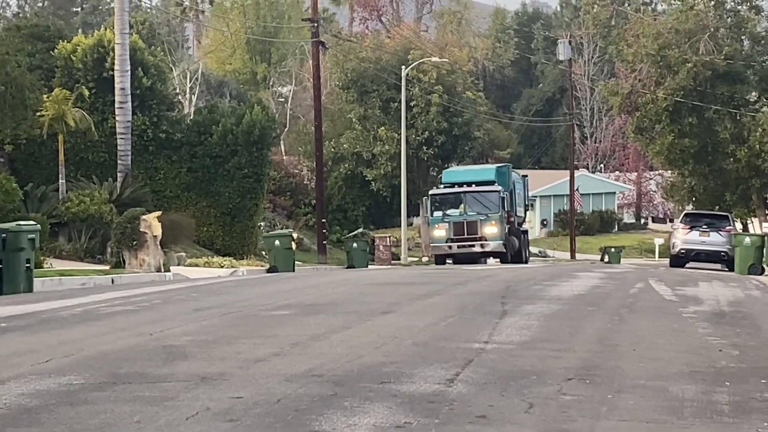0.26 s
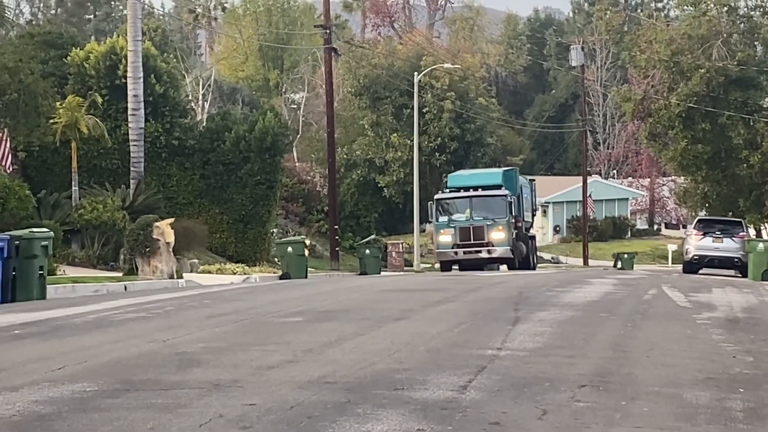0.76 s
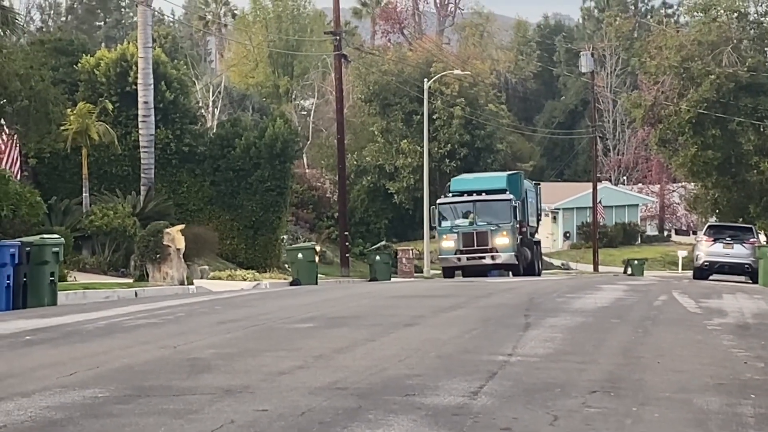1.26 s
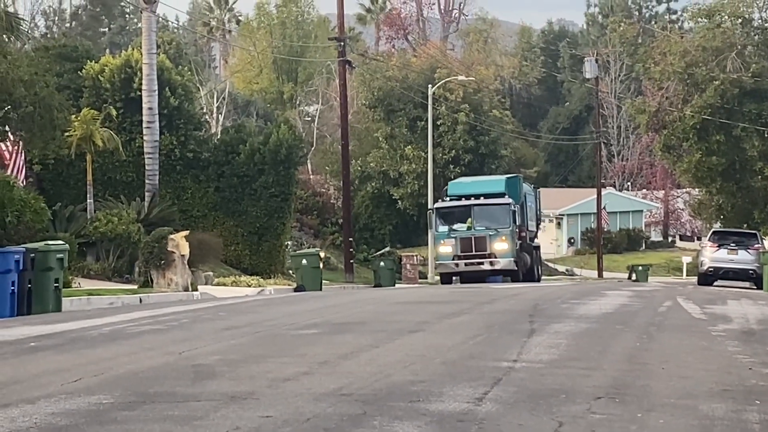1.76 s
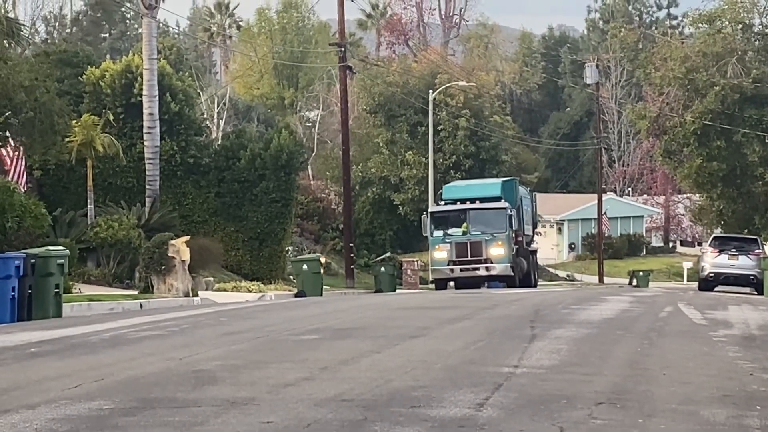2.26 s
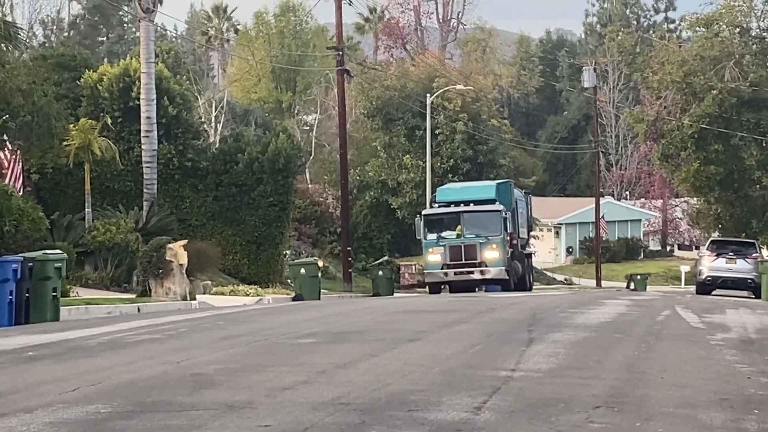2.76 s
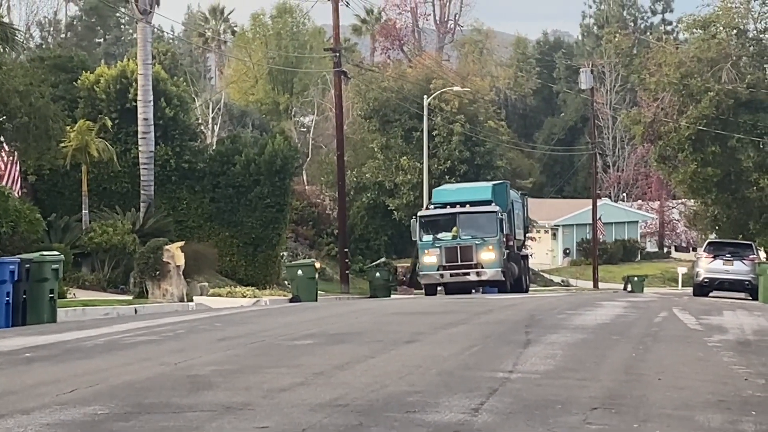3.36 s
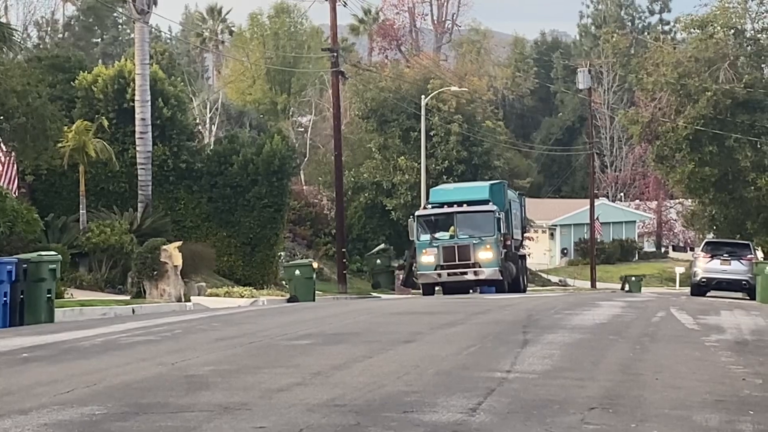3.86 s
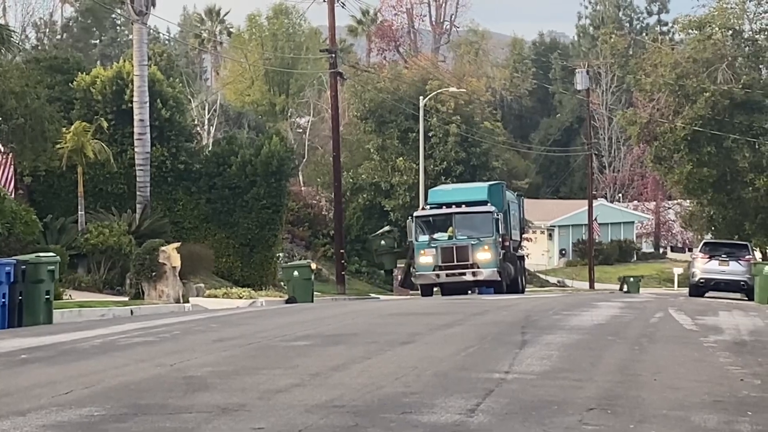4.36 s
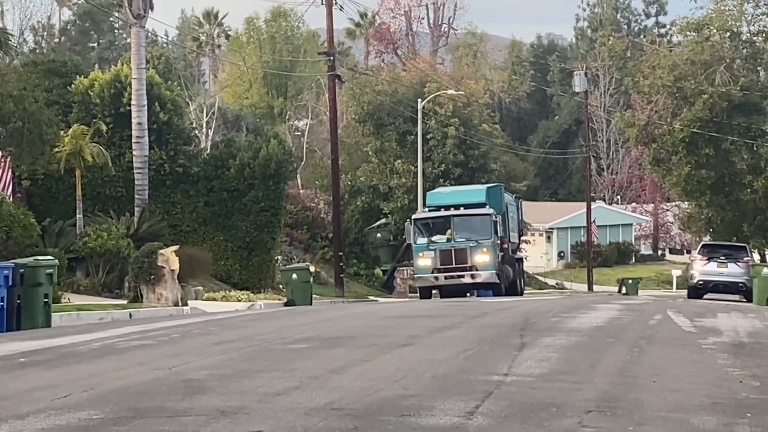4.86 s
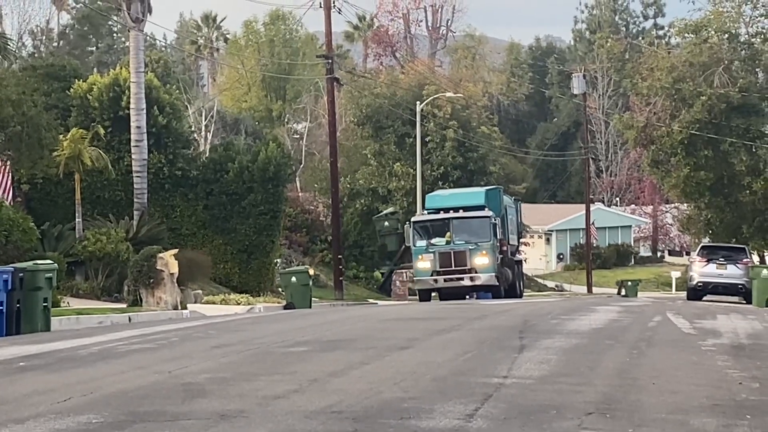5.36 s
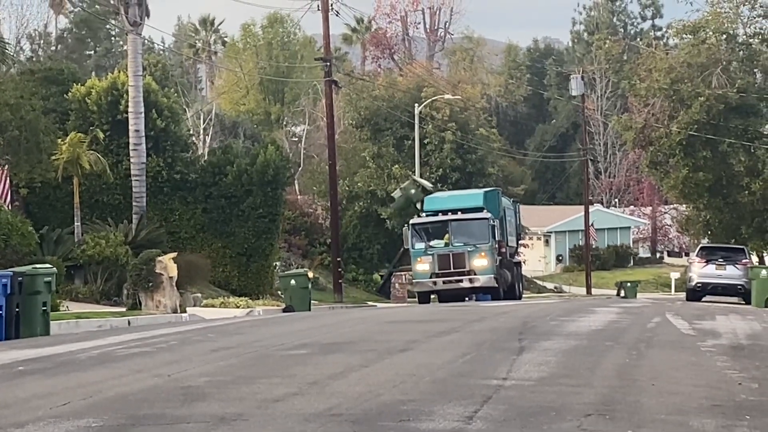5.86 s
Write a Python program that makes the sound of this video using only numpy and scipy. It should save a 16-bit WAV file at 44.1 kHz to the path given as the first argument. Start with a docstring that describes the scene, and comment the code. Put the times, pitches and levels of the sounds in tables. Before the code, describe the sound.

Distant garbage truck engine roars and whines, drops off, hisses and squeals to a stop, revs again, then metal body parts crash.

```python
"""A heavy refuse truck's six-cylinder engine pulls far down a residential street, eases off and pulls again;
its hydraulic pump whines along, a tone and throbbing noise locked to one shaft. A sinking aircraft whine is a
gliding sine, and a thin hiss is filtered noise. The brakes squeal in narrow-band modes and puff noise; then
steel body parts bang and bounce as decaying noise and ringing modes. House fronts scatter the sound to a pair
of microphone ports."""
import sys
import numpy as np
from scipy import signal
from scipy.fft import rfft, irfft, next_fast_len
from scipy.io import wavfile
from scipy.ndimage import uniform_filter1d, map_coordinates

SR = 44100
rng = np.random.default_rng(int(sys.argv[2]) if len(sys.argv) > 2 else 0)


def unload_wav(signal):
    """Save mono or channel-first audio to the path in sys.argv[1] as 16-bit WAV at rate SR, clipped to [-1, 1]."""
    wavfile.write(
        sys.argv[1],
        SR,
        np.round(np.clip(np.atleast_2d(signal).T, -1, 1) * 32767).astype(np.int16),
    )


N = 269451


def amp(db):
    """Level definition: 20 dB is a factor of ten in amplitude."""
    return 10 ** (np.asarray(db) / 20)


def unit(x):
    """Normalization: scale a signal to rms 1."""
    return x / np.sqrt(np.mean(x ** 2) + 1e-20)


def along(points, hz):
    """Logarithmic frequency scale: interpolate (f/Hz, value) points."""
    f, value = np.transpose(points)
    return np.interp(np.log(hz + 1), np.log(f + 1), value)


def curves(rows):
    """Linear interpolation in time: one value per sample for each column after t/s."""
    s, *columns = np.transpose(rows)
    t = np.arange(N) / SR
    return [np.interp(t, s, column) for column in columns]


def wobble(rate):
    """Slow random modulation: a smooth curve through `rate` Gaussian knots a second."""
    knots = rng.standard_normal(int(N * rate / SR) + 4)
    return map_coordinates(knots, [np.arange(N) * rate / SR])


def swell(peak_s, db, rise_s, fall_s):
    """Exponential growth and decay: 20 dB up to the peak, and down from it, in each given time."""
    t = np.arange(N) / SR - peak_s
    return amp(db - 20 * np.maximum(-t / rise_s, t / fall_s))


def filtered(x, response):
    """Linear filtering: multiply the spectrum by a complex response of frequency."""
    m = next_fast_len(N + SR // 2)
    spectrum = rfft(x, m) * response(np.fft.rfftfreq(m, 1 / SR))
    return irfft(spectrum, m)[..., :N]


def noise(spectrum, patchy_db, throb=1, knocks=0):
    """Subtractive synthesis: patchy noise plus knocks, modulated, then coloured and scaled to rms 1."""
    z = signal.stft(rng.standard_normal(N), nperseg=512)[2]
    # smooth over neighbouring bands, then over time
    field = uniform_filter1d(rng.standard_normal(z.shape), 6, 0)
    field = uniform_filter1d(field, 12, 1)
    white = signal.istft(z * amp(patchy_db * unit(field)), nperseg=512)[1][:N]
    source = throb * (unit(white) + knocks)
    return unit(filtered(source, lambda hz: amp(along(spectrum, hz))))


def tone(cycles):
    """Phase-driven oscillator: a sine of rms 1 at a random starting phase."""
    return np.sqrt(2) * np.sin(2 * np.pi * (cycles + rng.random()))


# brief dips of the pump tone: t/s, depth/dB, half width/s
PUMP_DIPS = [(2.55, 15.5, 0.1495), (4.3, 14, 0.063), (4.54, 30, 0.0688), (5.5, 7.5, 0.06894)]


def pump(teeth, pump_db):
    """Tooth-passing tone: each pump tooth gives one cycle, with small level and phase jitter."""
    t = np.arange(N) / SR
    dips_db = sum(db * np.clip(1 - np.abs(t - s) / half, 0, 1) for s, db, half in PUMP_DIPS)
    return amp(pump_db - dips_db + 1.3 * wobble(18)) * tone(teeth + .032 * wobble(28))


# gear whines: multiple of the tooth rate, peak t/s, mean peak level/dB, rise/s per 20 dB, fall/s per 20 dB
WHINES = [(5.06, .3, -51, .8, .8), (4.07, .85, -47, 1.6, 1.2), (6, .85, -51, .7, .7),
          (8.5, .9, -57, .6, .5), (4.07, 3, -52, 1.4, .87), (8.15, 3.1, -60.5, 2.2, .64),
          (4.06, 4.25, -47.5, .5, 1.2), (5.07, 4.45, -48, .8, .9), (8.35, 4.5, -54, .3, .2),
          (2, 4.55, -39, .5, .05), (4.07, 4.72, -45, .4, 1.4), (2, 4.9, -34, .3, .1),
          (2, 5.253, -42, .32, .5)]


def gears(teeth):
    """Gear-mesh tones: fixed ratios to the shaft, each swelling and fading."""
    out = np.zeros(N)
    for ratio, *shape in WHINES:
        level = swell(*shape) * amp(3.2 * wobble(15))
        out += level * tone(ratio * teeth + .09 * wobble(32))
    return out


# engine orders: multiple of the firing rate, mean level/dB re the firing tone
ORDERS_OF_FIRING = [(.5, -35), (1.5, -30), (2, -33), (2.5, -13), (3, -34.5)]


def firing_tones(firings):
    """Engine orders: a firing tone with wavering tones at multiples of its rate."""
    out = tone(firings)
    for order, db in ORDERS_OF_FIRING:
        out += amp(db + 2.8 * wobble(6.9)) * tone(order * firings)
    return out


# spectrum of the pipe's lowest resonances: f/Hz, relative level/dB per Hz
BOOM = [(20, -48), (40, -15.5), (62, -4.5), (85, 2), (100, -1.5), (130, -15), (165, -8), (200, -9),
        (250, -40), (300, -63)]
BOOM_DB, BOOM_GROWS = -38, 0.214  # mean level at full load; dB per dB of load


def boom(load_db):
    """Pipe resonance: low-frequency noise coloured by the exhaust pipe's lowest modes."""
    level_db = BOOM_DB + BOOM_GROWS * load_db + 1.1 * wobble(6)
    return amp(level_db) * noise(BOOM, patchy_db=1.0)


# exhaust roar spectrum: f/Hz, relative level/dB per Hz
ROAR = [(65, -36), (110, -5), (130, -12), (163, -5), (183, -5.5), (232, -5), (360, -4.5), (482, -8.5),
        (601, -5.5), (676, -22), (720, -27), (940, -52), (1580, -120)]


def exhaust_roar(pulse):
    """Amplitude modulation: each firing throbs the exhaust noise."""
    return noise(ROAR, patchy_db=0.8868, throb=1 + 0.763 * pulse)


# block and fan spectrum before the panels: f/Hz, relative level/dB per Hz
RUSH = [(400, -25.5), (680, 1.5), (1000, 0.5), (1400, -1.5), (1850, -7), (2200, -5), (2450, -7.5),
        (2650, -11), (3150, -10.5), (4000, -13), (5000, -17.5), (7000, -27), (9000, -32), (16000, -67)]
# cab and block resonances: f/Hz, width/Hz, lift/dB
PANELS = [(860, 30, 4), (1032, 25, 5), (1255, 25, 3), (1684, 22, 4), (1863, 25, 3), (1972, 22, 3),
          (2066, 25, 4), (2247, 30, 4), (2425, 25, 3), (3158, 30, 4)]
# treble affected by the brightness control: f/Hz, share
BRIGHT = [(1000, 0), (2500, 0.47), (5000, 0.654)]
RUSH_DB, RUSH_GROWS = -35.5, 1.119  # level at full load before brightness; dB per dB of load
# treble gain at t = 0 and full load; dB/s as the truck draws near; dB per dB of load
BRIGHT_DB, BRIGHT_DB_PER_S, BRIGHT_GROWS = -3.5, 1.1713, 0.245
KNOCK_SHARE, KNOCK_GRAINS = .55, 2048  # knock level re the noise; random values in one engine cycle


def block(firings, pulse, load_db):
    """Forced resonance: noise and cyclic knocks excite the cab and block."""
    # valves and injectors repeat every six firings
    grain = (firings / 6 % 1 * KNOCK_GRAINS).astype(int)
    cycle = rng.standard_normal(KNOCK_GRAINS)[grain]
    rush = noise(RUSH, patchy_db=0.77, throb=1 + 0.3 * pulse, knocks=KNOCK_SHARE * cycle)

    def panel_gain(hz):
        """Resonance curve: each mode lifts a band of its own width."""
        return amp(sum(db / (1 + (2 * (hz - centre) / width) ** 2) for centre, width, db in PANELS))

    rush = unit(filtered(rush, panel_gain))
    treble = filtered(rush, lambda hz: np.clip(along(BRIGHT, hz), 0, 1))
    bright_db = BRIGHT_DB + BRIGHT_DB_PER_S * np.arange(N) / SR + BRIGHT_GROWS * load_db
    rush += (amp(bright_db) - 1) * treble
    return amp(RUSH_DB + RUSH_GROWS * load_db) * rush


# engine course: t/s, pump tooth rate f/Hz, load as exhaust roar level/dB, firing tone level/dB,
# pump tone mean level/dB before its dips
ENGINE = [(0, 325.6, -27, -40, -31), (.15, 329.4, -26.3, -32, -29.5), (.5, 339.5, -26.8, -36.5, -28.5),
          (.8, 342.1, -26, -39.5, -25.5), (1.08, 345.2, -26, -35, -28), (1.19, 330.2, -26.5, -31, -33.5),
          (1.38, 281.6, -31, -34, -26.5), (1.55, 236.1, -34, -61, -41), (1.75, 184.8, -37.5, -63, -44),
          (1.9, 163.4, -39.5, -62, -40.5), (2.13, 170, -39, -62, -42), (2.38, 178, -37, -61.5, -35.5),
          (2.7, 181.6, -37.5, -60.5, -40), (3.11, 179.6, -38, -61.5, -40), (3.35, 196.7, -37, -60.5, -33),
          (3.5, 205, -33.5, -51, -51.5), (3.61, 207.1, -31.5, -45, -51.5), (3.645, 212.7, -29, -35, -50),
          (3.77, 243, -30.5, -32.5, -45), (3.87, 256.5, -31, -30.5, -33), (4.0, 265.6, -31, -38.5, -32),
          (4.2, 279.7, -29.5, -31.5, -29.5), (4.45, 295, -29, -26, -28.5), (4.62, 301.8, -26.5, -22.5, -29),
          (4.82, 310.3, -28, -28.5, -32), (5.0, 312.1, -27, -29, -34), (5.4, 286.9, -27, -29.5, -30.5),
          (5.68, 269, -31.5, -40.5, -30), (5.86, 253.4, -31.5, -57, -32.5), (6.0, 255, -32, -39, -48.5),
          (6.11, 236, -34.5, -41.5, -54.5)]
FIRING_PER_TOOTH = .258
FULL_DB = -27  # exhaust roar level taken as full load


def engine():
    """Common-shaft synchronism: pump teeth, gears and firings all follow one rotation."""
    tooth_hz, roar_db, firing_db, pump_db = curves(ENGINE)
    load_db = roar_db - FULL_DB
    teeth = np.cumsum(tooth_hz) / SR
    firings = FIRING_PER_TOOTH * teeth
    strength = amp(1.6 * wobble(60))  # cylinders never fire quite alike
    pulse = strength * np.exp(-2.5 * (firings % 1))
    tones = pump(teeth, pump_db) + gears(teeth) + amp(firing_db) * firing_tones(firings)
    roar = amp(roar_db) * exhaust_roar(pulse)
    return tones + boom(load_db) + roar + block(firings, pulse, load_db)


# a far aircraft's whine sinks as it passes: t/s, f/Hz, mean level/dB
FLYOVER = [(0, 530, -48), (.4, 523, -50), (1.0, 514, -54), (1.6, 504, -57), (1.9, 500, -51),
           (2.2, 496, -52), (2.6, 491, -59), (3.05, 488, -53), (3.4, 486, -54), (3.6, 483, -44),
           (3.95, 482, -49), (4.4, 479.5, -46), (4.75, 478, -48), (5.0, 477, -55), (5.5, 474, -52),
           (6.11, 471, -58)]


def aircraft():
    """Frequency modulation: a sinking sine whose phase sums its frequency, slightly wavering."""
    hz, db = curves(FLYOVER)
    return amp(db + 1.5 * wobble(8)) * tone(np.cumsum(hz) / SR + .03 * wobble(10))


# course of the thin hiss: t/s, level/dB
HISS = [(0, -60), (.46, -66.5), (1.09, -60.5), (1.75, -75), (1.95, -65.5), (2.35, -64), (2.98, -76.5),
        (3.79, -57.5), (4.12, -65.5), (4.56, -57), (4.8, -67.5), (5.3, -62.5), (5.89, -66.5), (6.11, -60)]
# hiss spectrum: f/Hz, relative level/dB per Hz
HISS_COLOUR = [(3000, -32), (5500, 3.5), (8000, 3.5), (11000, -1), (12000, -5.5), (15000, -9.5),
               (16000, -12.5)]


def hiss():
    """Band-shaped noise: a thin hiss of varying level goes on throughout."""
    return amp(curves(HISS)[0]) * noise(HISS_COLOUR, patchy_db=3.0)


GRIP_S = 0.0265  # a stretch of squeal sets in and stops within this time


def sing(rows):
    """Stick-slip: the chattering shoe spreads a stretch of squeal from a tone into narrow-band noise."""
    hz, db, chatter = curves(rows)
    t = np.arange(N) / SR
    to_nearest_end = np.minimum(t - rows[0][0], rows[-1][0] - t)
    edges = np.clip(to_nearest_end / GRIP_S + .5, 0, 1)
    share = np.clip(chatter, 0, 1)
    carrier = np.exp(2j * np.pi * np.cumsum(hz) / SR)
    random_part = (wobble(130) + 1j * wobble(130)) / np.sqrt(2)
    slips = carrier * (np.sqrt(1 - share ** 2) + share * random_part)
    return edges * amp(db) * np.sqrt(2) * slips.real


# stretches of brake squeal, one curve each; a mode may sing in several: t/s, f/Hz, level/dB, chatter 0-1
SQUEALS = [
    [(2.3, 6055, -67.5, 0.51), (2.332, 6005, -48, 0.45), (2.354, 6048, -64.5, 0.5),
     (2.378, 6046, -41, 0.48), (2.394, 5974, -62.5, 0.5), (2.452, 5984, -46.5, 0.64),
     (2.466, 5981, -59.5, 0.5), (2.484, 5978, -45, 0.63), (2.558, 5986, -42.5, 0.49),
     (2.586, 5946, -57, 0.49), (2.63, 5935, -39, 0.5), (2.646, 5950, -47, 0.65), (2.734, 5984, -46, 0.6),
     (2.8, 5975, -54, .65), (2.89, 5990, -59, 0.65)],
    [(2.56, 5935, -56, .5), (2.7, 5920, -51, .5), (2.76, 5915, -54, .55), (2.89, 5900, -63, .6)],
    [(3.31, 5740, -70, .6), (3.35, 5750, -62, .6), (3.38, 5770, -68, .6)],
    [(2.88, 6035, -58, 0.55), (2.916, 6040, -48, 0.52), (2.944, 6022, -56, 0.55), (2.97, 6048, -46.5, 0.68),
     (3.046, 6028, -53.5, 0.62), (3.208, 6067, -51, 0.57), (3.235, 6085, -54, 0.55)],
    [(3.22, 6100, -53, 0.3), (3.292, 6106, -37, 0.43), (3.336, 6124, -43.5, 0.18),
     (3.372, 6122, -41.5, 0.3), (3.4, 6119, -64.5, 0.22), (3.428, 6121, -50, 0.2),
     (3.458, 6116, -67.5, 0.2), (3.506, 6118, -55, 0.21), (3.53, 6114, -74.5, 0.2)],
    [(2.47, 5100, -65, 0.4), (2.476, 5083, -59, 0.4), (2.582, 5050, -50, 0.4), (2.594, 5049, -60, 0.41),
     (2.608, 5020, -55.5, 0.4), (2.672, 5013, -54, 0.42), (2.69, 5040, -64, 0.4),
     (2.756, 5040, -47.5, 0.43), (2.85, 5018, -59, 0.41), (2.862, 5015, -66, 0.4),
     (2.886, 5028, -53.5, 0.45), (2.99, 4995, -65, 0.4)],
    [(3.0, 5058, -70, 0.6), (3.012, 5100, -62.5, 0.6), (3.168, 5160, -63, 0.6), (3.2, 5103, -69, 0.6)],
    [(2.71, 6457, -75, 0.6), (2.736, 6430, -60, 0.6), (2.756, 6390, -69.5, 0.6), (2.818, 6390, -45.5, 0.58),
     (2.848, 6404, -57.5, 0.6), (2.91, 6410, -50.5, 0.61), (2.934, 6442, -69, 0.6),
     (2.942, 6423, -61.5, 0.6), (3.08, 6410, -68, 0.6)],
    [(3.09, 6509, -68, 0.25), (3.14, 6498, -49, 0.25), (3.162, 6500, -50.5, 0.25), (3.196, 6498, -62, 0.27),
     (3.218, 6496, -51, 0.25), (3.256, 6508, -65, 0.25), (3.272, 6500, -57, 0.25), (3.32, 6501, -69, 0.25),
     (3.346, 6493, -54, 0.25), (3.5, 6460, -70, 0.25)],
    [(2.91, 7057, -77, 0.5), (2.966, 7118, -64.5, 0.51), (3.03, 7103, -65.5, 0.5), (3.06, 7065, -79.5, 0.5)],
    [(3.19, 7043, -75, 0.2), (3.22, 7014, -58, 0.2), (3.25, 7014, -76, 0.2)],
    [(2.41, 8320, -62, .5), (2.44, 8310, -51.5, .5), (2.5, 8300, -65.5, .6), (2.66, 8270, -61.5, 0.79),
     (2.83, 8320, -70, .6)],
    [(3.04, 8310, -68.5, .4), (3.11, 8308, -50.5, 0.32), (3.18, 8308, -62.5, 0.33), (3.22, 8310, -56.5, .3),
     (3.25, 8320, -64, .3), (3.3, 8310, -58, .3), (3.36, 8330, -71.5, .3)],
    [(2.91, 8690, -60.5, .5), (3.06, 8610, -59, .5)],
    [(2.46, 11060, -69.5, 0.61), (2.6, 11030, -65, 0.82), (2.85, 11060, -69.5, .7), (3.0, 11130, -70, 0.63),
     (3.1, 11170, -72, .5), (3.17, 11140, -82.5, .5)],
    [(2.9, 12050, -82.5, .5), (3.1, 12150, -83, .5), (3.37, 12230, -78, .4)],
]


def brake_squeal():
    """Superposition: the stretches of squeal from the drum's modes add."""
    return sum(sing(rows) for rows in SQUEALS)


# brake air spectrum: f/Hz, relative level/dB per Hz
AIR = [(500, -4), (1000, 1.5), (1600, -5.5), (2300, 0), (3300, -4), (5000, -11.5), (8000, -22.5),
       (16000, -52)]
PUFF_S, PUFF_DB, PUFF_RISE_S, PUFF_FALL_S = 2.445, -36.5, 0.1104, 0.178  # peak; time per 20 dB


def brake_puff():
    """Jet noise: air from the brake valve is a swelling, fluttering broadband noise."""
    air = noise(AIR, patchy_db=2.2, throb=amp(1.4 * wobble(250)))
    return swell(PUFF_S, PUFF_DB, PUFF_RISE_S, PUFF_FALL_S) * air


# frame jolts and small pings: t/s, level/dB before the soft onset, f/Hz, t60/s
THUMPS = [(2.345, -26, 228.2, 0.203), (2.409, -21.5, 226, .12), (2.4265, -24.5, 228, .17),
          (2.488, -38, 2370, .08), (2.875, -39.5, 1640, 0.1), (2.98, -45.5, 3050, 0.068),
          (2.98, -48, 3315, 0.065), (3.634, -19, 80.9, 0.264), (3.634, -18.5, 168.6, 0.114),
          (3.6275, -27, 1000, .05), (3.629, -26.5, 433, 0.102), (3.648, -27.5, 259.9, 0.079),
          (5.333, -17, 289, 0.116), (5.333, -19.5, 557.5, 0.11), (5.17, -18, 199, 0.202),
          (5.17, -23.5, 49.85, 0.195)]


def chassis():
    """Damped free vibration: jolts and pings are single soft-edged, decaying sines."""
    out, t = np.zeros(N + SR), np.arange(SR // 2) / SR
    for s, db, hz, t60 in THUMPS:
        envelope = amp(db - 60 * t / t60) * (1 - np.exp(-t / .0025))
        out[round(s * SR):][:len(t)] += envelope * np.sin(2 * np.pi * hz * t)
    return out[:N]


# resonant modes, mostly of struck steel: f/Hz, width/Hz, mean relative level/dB
STEEL = [(560, 80, 13), (765, 35, -3), (1035, 22, 7), (1150, 35, 0), (1330, 35, -3), (1670, 35, -1),
         (1810, 35, 2), (1972, 22, 6), (2180, 35, 2), (2340, 35, 1), (2460, 35, -1), (3390, 35, -1),
         (3470, 25, 3), (3780, 45, -2), (4700, 50, -4), (4945, 30, 2), (6980, 60, -5)]
STRUCK_DB_PER_OCTAVE = 8  # modes far from the given pitch ring this much weaker


def steel_ring(struck_hz, ring):
    """Modal synthesis: each burst excites the modes at new strengths and pitches."""
    hz, width, level = np.transpose(STEEL)[..., None]
    strength, drift = rng.standard_normal((2, len(STEEL), 1))
    # a wandering phase blurs each mode to its width
    steps = rng.standard_normal((len(STEEL), len(ring)))
    slips = np.cumsum(steps, axis=1) * np.sqrt(width / SR)
    near_db = -STRUCK_DB_PER_OCTAVE * np.abs(np.log2(hz / struck_hz))
    phase = 2 * np.pi * hz * (1 + .006 * drift) * ring + np.sqrt(2 * np.pi) * slips
    return (amp(level + near_db + 4 * strength) * np.sin(phase)).sum(axis=0)


# steel on steel; the first row is the low, breathy start of the brake puff: t/s, reference level/dB,
# envelope t60/s (held to .03-.6 s), clang gain/dB re reference, sizzle level/dB re reference,
# pitch of the struck part (in the first row, of the breath) f/Hz
BANGS = [(2.38, -40.5, 0.305, -7.5, -45, 1000), (3.6274, -35, 0.16, -17.5, -37, 898),
         (3.68, -31, 0.66, -28, -32.5, 2000), (3.815, -31, 0.5, -24, -33, 2299),
         (4.557, -24, 0.243, -26, -41.5, 2402), (4.8912, -24, .14, -22, -30.5, 2000),
         (5.005, -30.5, 0.092, -20.5, -35, 3301), (5.1029, -23, 0.147, -22, -30, 4500),
         (5.1572, -19.5, 0.216, -19, -43.5, 3300), (5.172, -22, 0.246, -15, -41, 1200),
         (5.19, -25, 0.2, -22.5, -45, 1500), (5.204, -25, .3, -20, -42, 3300),
         (5.228, -32.5, 0.28, -15, -38.5, 2000), (5.28, -28.5, 0.22, -17.5, -34.5, 4800),
         (5.3086, -18.5, 0.195, -15, -31.5, 2100), (5.3323, -15, 0.1646, -21, -30, 1000),
         (5.5074, -20.5, 0.264, -20, -25, 4200), (5.528, -28, 0.2, -19, -35, 1500),
         (5.538, -27, .15, -19, -33, 2300), (5.595, -31, .08, -18.5, -23.5, 5000),
         (5.655, -24, 0.225, -17, -25, 3200), (5.671, -29, .1, -16, -33, 1900),
         (5.6795, -25.5, 0.115, -16, -33, 1900), (5.692, -31.5, 0.097, -17.5, -31, 4900),
         (5.7799, -26.5, 0.207, -18, -24, 2600), (5.7988, -30.5, .14, -13, -38, 2000),
         (5.815, -33, .1, -19, -28, 2000), (5.891, -30, 0.164, -23.5, -33, 2500),
         (5.91, -23.5, .086, -19, -27, 2000), (5.984, -34, .08, -19, -30, 2500),
         (6.0175, -25.5, 0.107, -15.5, -31.5, 3600)]
# rattling spectrum: f/Hz, relative level/dB per Hz
CRASH = [(250, 3), (600, 2.5), (2000, -2.5), (5000, -9), (8000, -23), (10000, -27.5), (16000, -87)]
# spectrum of a bang's sharp edge: f/Hz, relative level/dB per Hz
SIZZLE = [(5000, -39), (7500, 3.5), (11000, -2), (13000, -13.5), (16000, -19.5)]
CRASH_DB = -7.5  # rattling re the reference level
LINGER_DB, LINGER_S = -15, 0.821  # the rattling lingers: level re the crash, t60
TICK_DB, TICK_S = -4, .006  # first contact: level re the rattling, t60


def body_and_puff_start():
    """Impulsive excitation: bursts of noise with ringing modes make the bangs and the puff's low start."""
    crash, edge, clang = np.zeros((3, N + SR))
    t = np.arange(SR // 2) / SR
    ring = t[:SR // 4]
    for s, db, t60, clang_db, edge_db, struck_hz in BANGS:
        start = round(s * SR)
        shape = amp(-60 * t / np.clip(t60, .03, .6)) * (1 - np.exp(-t / .001))
        linger = amp(LINGER_DB - 60 * t / LINGER_S) * (t > .01)
        crash[start:][:len(t)] += amp(db + CRASH_DB) * np.maximum(shape, linger)
        crash[start:][:len(t)] += amp(db + CRASH_DB + TICK_DB - 60 * t / TICK_S)
        edge[start:][:len(t)] += amp(db + edge_db) * shape ** 1.51
        modes = steel_ring(struck_hz, ring)
        clang[start:][:len(ring)] += amp(db + clang_db) * shape[:len(ring)] * modes
    debris = amp(1.3 * wobble(170) + 2.2 * wobble(450))  # loose parts make the crash grainy
    rattle = crash[:N] * noise(CRASH, patchy_db=2.5, throb=debris)
    sizzle = edge[:N] * noise(SIZZLE, patchy_db=1.5)
    return rattle + debris * sizzle + np.sqrt(debris) * clang[:N]


# likeness of the truck's sound at the ports: f/Hz, left-right likeness 0-1
ALIKE = [(100, .995), (200, .96), (380, .96), (600, .9), (800, .83), (1400, .86), (1900, .94), (2200, .998),
         (3200, .999), (3700, .9998), (8200, 1)]


def scene():
    """Diffuse scattering: direct sound is alike at both ports; scattered sound and aircraft are opposite."""
    truck = engine() + hiss() + brake_squeal() + brake_puff() + chassis() + body_and_puff_start()
    t = np.arange(SR // 2) / SR
    houses = rng.standard_normal(len(t)) * amp(-60 * t / .45)  # t60 .45 s
    scattered = signal.fftconvolve(truck, houses / np.linalg.norm(houses))[:N]
    # a side signal at tan(arccos(likeness) / 2) of the direct sound
    side = filtered(scattered, lambda hz: np.tan(np.arccos(np.clip(along(ALIKE, hz), 0, 1)) / 2))
    side += aircraft()
    return np.array([truck + side, truck - side])


# level difference of the ports: f/Hz, left over right level/dB
LEFT_DB = [(60, 2), (170, 2.4), (350, 1.8), (600, 1), (860, 2.6), (1500, 2.8), (1900, 1.8), (2400, 0)]
# phase difference of the ports: f/Hz, cycles the right port leads
LEAD = [(7400, 0), (8800, .5), (9300, .5), (10800, 1), (11650, 1), (12750, 1.5), (13750, 1.5), (14600, 2)]
TOP_HZ = 15720  # band limit


def record(dry):
    """Interchannel differences: the ports differ in level and treble phase, up to the band limit."""
    half = np.array([[.5], [-.5]])  # each port takes half the difference

    def ports(hz):
        """Complex transfer function: gain and phase of each port."""
        gain = amp(half * along(LEFT_DB, hz))
        phase = np.exp(-2j * np.pi * half * along(LEAD, hz))
        return gain * phase * (hz < TOP_HZ)

    return filtered(dry, ports)


dry = scene()
out = record(dry)
unload_wav(out)
```